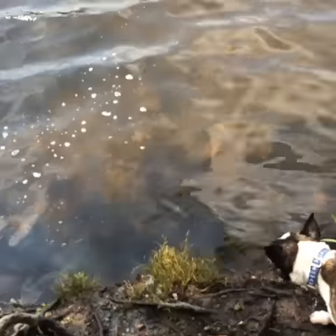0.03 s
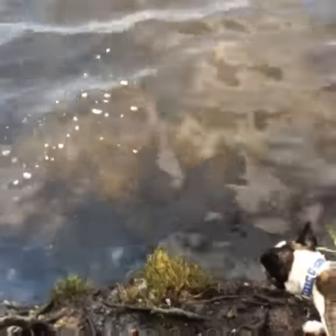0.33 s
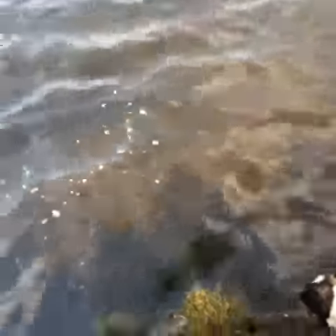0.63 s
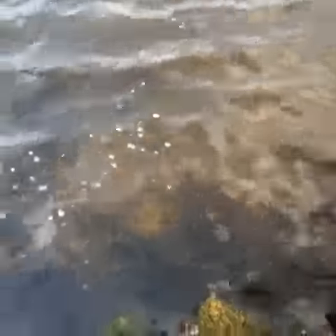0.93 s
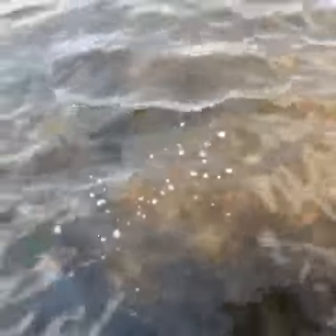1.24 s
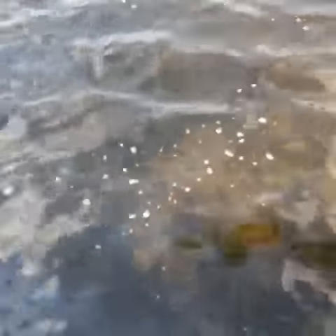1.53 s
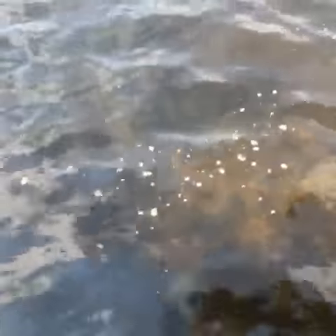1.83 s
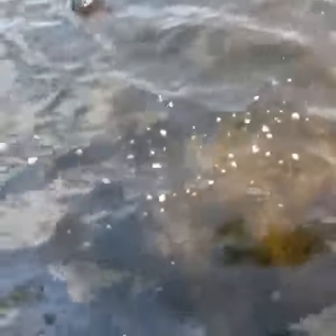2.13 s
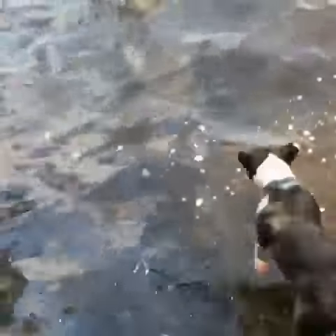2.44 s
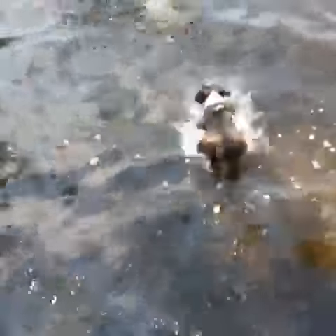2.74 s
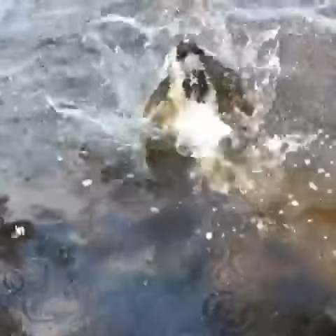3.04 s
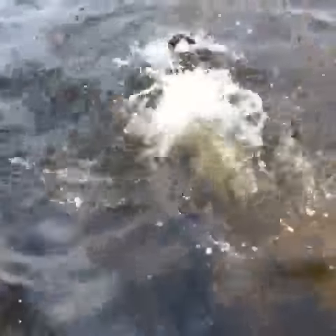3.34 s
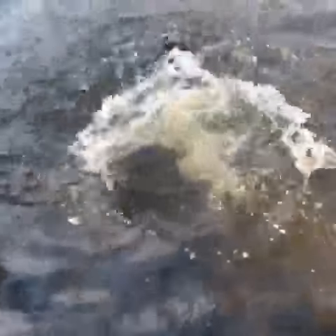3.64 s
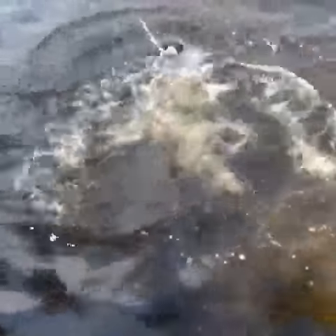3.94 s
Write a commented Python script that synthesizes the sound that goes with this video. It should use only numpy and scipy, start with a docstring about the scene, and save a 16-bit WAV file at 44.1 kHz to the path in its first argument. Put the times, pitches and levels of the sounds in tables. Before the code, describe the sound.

A loud splash as a little dog jumps into water, spray pattering down afterward.

```python
"""A small dog leaps into a lake, heard close by from one microphone on the gritty bank.
Its paws scuff and push off, its forepaws cut the surface and its chest slaps down. The air cavity
behind it rings and gulps shut, churned bubbles ring, and the thrown water patters back.
The shore scatters a short echo. Small waves trickle at the edge; wind rumble and a distant wash
lie behind."""
import sys
import numpy as np
from scipy import signal
from scipy.io import wavfile
from scipy.ndimage import uniform_filter1d

SR = 44100
rng = np.random.default_rng(int(sys.argv[2]) if len(sys.argv) > 2 else 0)


def wrap_up_sound(samples):
    """Save the sound to the file named by the first command line argument, as 16-bit audio."""
    columns = np.atleast_2d(samples).T
    # keep every value between -1 and 1, then stretch to whole-number steps
    tamed = np.clip(columns, -1, 1)
    steps = np.round(tamed * 32767).astype(np.int16)
    wavfile.write(sys.argv[1], SR, steps)


N = 176400
TIME = np.arange(N) / SR

# spectrum of plinking water, in spray and ripples: (frequency [Hz], relative density [dB])
PLINK_SPECTRUM = [(1100, 0.5), (3300, -3), (6500, -10.5)]


def slaps():
    """Forepaws and chest hit the surface, each with a sharp crack."""
    # hits on the water: (time [s], level before the band-pass [dB])
    hits = [(2.785, -20), (2.7892, -20), (2.8207, -18.5), (2.8318, -12), (2.836, -4.5), (2.849, -7)]
    return cracks(hits, fade_s=.0006, band_hz=(1150, 9600))


def cavity():
    """The air cavity behind the body rings: its tone climbs as it narrows, sinks as it is pulled under."""
    # course of the hollow tone: (time [s], pitch [Hz], level [dB])
    course = [(2.846, 370, -26.5), (2.885, 393.6, -32.5), (2.91, 457, -38), (2.943, 471, -25),
              (2.96, 468, -45), (2.978, 415, -26.5), (2.999, 305, -35.5)]
    s, hz, db = np.transpose(course)
    loudness = uniform_filter1d(amp(np.interp(TIME, s, db, left=-200, right=-200)), size=200)
    flutter = amp(1.8 * drift(per_s=120))
    phase = 2 * np.pi * np.cumsum(np.interp(TIME, s, hz)) / SR
    return loudness * flutter * np.sin(phase)


def gulps():
    """Air pockets collapse, each with a low, slightly rising note."""
    # collapses: (time [s], level [dB], starting pitch [Hz], time to fall 60 dB [s])
    pockets = [(2.943, -17.5, 180, 0.07), (2.991, -19.5, 212, 0.094), (3.039, -22, 181.4, 0.12),
               (3.05, -24, 624, .09), (3.086, -26.5, 198, 0.095), (3.109, -16, 332, 0.035),
               (3.341, -15.5, 347, 0.023)]
    return pings(pockets, attack_s=0.0016, rise_per_s=1.4)


def bubbles():
    """Churned water fills with a cloud of briefly ringing bubbles."""
    # strength of the churning: (time [s], level [dB])
    churn = [(2.74, -58), (2.785, -36), (2.815, -55), (2.838, -30.5), (2.851, -22.5), (2.91, -30.5),
             (2.938, -27), (2.985, -40.5), (3.03, -35), (3.09, -26.5), (3.12, -29), (3.15, -40),
             (3.3, -40.5), (3.5, -38), (3.64, -41), (3.8, -45), (4.0, -44.5)]
    # spectrum of the cloud: (frequency [Hz], relative density [dB])
    spectrum = [(220, -4), (380, 1), (600, 3.5), (1000, 2.5), (1500, 0), (2300, -4), (4000, -20)]
    return grains(spectrum, level(churn), per_s=4000, cycles=21, spread_db=1.5, count=48)


def spray():
    """Water is thrown up and falls back as pattering drops, ringing plinks and a hiss of mist."""
    # swell of the spray, common to all three: (time [s], relative level [dB])
    swell = [(2.7, -49.5), (2.772, -41), (2.79, -27.5), (2.806, -34.5), (2.829, -29), (2.842, -22),
             (2.876, -29.5), (2.945, -33), (3.0, -37.5), (3.05, -32.5), (3.1, -31.5), (3.21, -33.5),
             (3.29, -29), (3.37, -31), (3.41, -35.5), (3.6, -31), (3.76, -42.5), (4.0, -43.5)]
    # spectrum of drops and mist: (frequency [Hz], relative density [dB])
    spectrum = [(600, -23), (1500, -9), (2900, -1.5), (4400, -10.5), (8000, -6), (11000, -12),
                (14500, -14.5), (16000, -7)]
    shower = level(swell)
    drops = amp(-6) * grains(spectrum, shower, per_s=10000, cycles=4.8, spread_db=3)
    plinks = amp(-10.5) * grains(PLINK_SPECTRUM, shower, per_s=1400, cycles=58, spread_db=4, count=64)
    mist = amp(-7) * shower * noise(spectrum, patchy_db=2.5, per_s=29, count=12)
    return drops + plinks + mist


def paws():
    """Each scuff on the bank sets off a dying rush of wet grit."""
    # paw scuffs: (time [s], level [dB], decay time constant [s])
    scuffs = [(2.062, -44, 0.023), (2.146, -32.5, 0.028), (2.204, -41.5, 0.068), (2.246, -35, 0.027),
              (2.315, -44, 0.2), (2.422, -43.5, 0.11), (2.48, -37.5, 0.013), (2.528, -64, 0.22),
              (2.725, -52.5, 0.06)]
    # spectrum of the grit: (frequency [Hz], relative density [dB])
    spectrum = [(300, 11.5), (700, -7.5), (1500, -3), (3000, -4.5), (6000, -5.5), (9000, -6.5),
                (14000, -7.5), (16000, -3.5)]
    attack_s = 0.0013
    effort = sum(amp(db) * (1 - np.exp(-since(s) / attack_s)) * np.exp(-since(s) / fade_s)
                 for s, db, fade_s in scuffs)
    return grains(spectrum, effort, per_s=12000, cycles=11.5, spread_db=0, count=48)


def thuds():
    """The push-off and heavy water land as dull, low knocks."""
    # knocks: (time [s], level [dB], pitch [Hz])
    knocks = [(.498, -31, 284), (.625, -23, 430), (2.135, -22, 170), (2.214, -19.5, 292), (2.585, -27, 106),
              (3.343, -20, 83), (3.392, -24, 96.5)]
    return pings(ringing(knocks, cycles=7.3), attack_s=0.0019, rise_per_s=0)


def ticks():
    """Twigs and stones tick, single drops land, and the chest slap rings low: a tiny crack around each pitch,
    then a short ring."""
    # small impacts, and the low ring of the chest slap at 2.849 s: (time [s], level of the ring [dB], pitch
    # [Hz])
    impacts = [(.506, -41, 4300), (0.527, -39, 2800), (.563, -40, 6500), (.685, -44, 2800),
               (.838, -40, 5960), (1.032, -40, 3880), (1.461, -33.5, 1750), (1.462, -41, 4400),
               (2.148, -18.5, 6870), (2.209, -29, 5960), (2.259, -26.5, 6200), (2.387, -22.5, 3100),
               (2.388, -25.5, 9300), (2.426, -27.5, 870), (2.428, -29, 3360), (2.461, -31, 4500),
               (2.637, -26, 1790), (2.728, -27, 11800), (2.849, -13, 950), (3.176, -30.5, 1030),
               (3.287, -15.5, 3310), (3.5, -20, 8950), (3.883, -22, 11400)]
    snaps = sum(cracks([(s, db - 6.5)], fade_s=.0017, band_hz=(hz / 1.8, hz * 1.8))
                for s, db, hz in impacts)
    return snaps + pings(ringing(impacts, cycles=24.7), attack_s=0.00011, rise_per_s=0)


def shore_echo(near):
    """The shore scatters nearby sound back to the microphone as a short, thin tail."""
    t60_s, delay_s = 0.25, 0.00637
    tail = band(rng.standard_normal(N), 110, 18500) * amp(-60 * TIME / t60_s) * (TIME > delay_s)
    return amp(-15) * signal.fftconvolve(near, tail / np.linalg.norm(tail))[:N]


def ripples():
    """Small waves fizz and trickle at the water's edge."""
    # rise and fall of the waves: (time [s], level [dB])
    lapping = [(.1, -73), (.53, -58), (.75, -69), (.92, -56.5), (1.1, -69), (1.45, -60.5)]
    return level(lapping) * grains(PLINK_SPECTRUM, np.ones(N), per_s=4100, cycles=6.5, spread_db=3)


def wind():
    """Wind rumbles over the shore, easing and returning, with a faint low hum in it."""
    # wind strength: (time [s], relative level [dB])
    strength = [(.1, -37), (1.5, -37), (1.85, -42.5), (2.5, -45.5), (3.2, -41), (3.68, -36.5), (3.77, -37),
                (3.87, -37.5)]
    # spectrum of the rumble: (frequency [Hz], relative density [dB])
    spectrum = [(20, -31), (35, -14.5), (58, 1.5), (100, 0), (150, 1), (200, -3), (260, -18), (500, -28)]
    gusts = amp(np.interp(TIME, *np.transpose(strength)) - 1.5)
    hum_hz = 109
    drone = resonate(rng.standard_normal(N), hum_hz, width_hz=6)
    hum = amp(-6) * unit(band(drone, hum_hz / 2, hum_hz * 2))
    rumble = noise(spectrum, patchy_db=1, per_s=30, count=12)
    return gusts * (hum + rumble)


def distant_wash():
    """An even, faintly flickering rush from far off."""
    # spectrum of the wash: (frequency [Hz], relative density [dB])
    spectrum = [(200, -15), (350, 2.5), (600, -1), (780, 0.5), (950, 5), (1250, -2.5), (1800, -10),
                (2800, -22), (5000, -24), (10000, -28.5), (15500, -34.5)]
    return amp(-44) * noise(spectrum, patchy_db=1.6, per_s=17, count=36)


def sizzle():
    """A thin, high sizzle grows through the first second and drops away."""
    # swell of the sizzle: (time [s], level [dB])
    swell = [(.1, -75), (.95, -66.5), (1.1, -100)]
    return level(swell) * unit(resonate(rng.standard_normal(N), hz=11300, width_hz=350))


def amp(db):
    """Decibels to gain."""
    return 10 ** (np.asarray(db) / 20)


def unit(x):
    """Scale to rms 1."""
    return x / np.sqrt(np.mean(x ** 2) + 1e-20)


def level(rows):
    """Gain over time from (time [s], level [dB]) rows; silent before the first, held after the last."""
    return amp(np.interp(TIME, *np.transpose(rows), left=-200))


def since(s):
    """Time since an event, zero before it."""
    return np.maximum(TIME - s, 0)


def drift(per_s):
    """Slow random wander, rms 1."""
    knots = rng.standard_normal(2048)
    return unit(np.interp(TIME * per_s, np.arange(len(knots)), knots))


def band(x, low_hz, high_hz):
    """Butterworth band-pass."""
    sos = signal.butter(2, [low_hz, min(high_hz, .47 * SR)], "band", fs=SR, output="sos")
    return signal.sosfilt(sos, x)


def band_gains(spectrum, hz):
    """Gains of log-spaced bands under a spectrum; total power 1."""
    knots_hz, db = np.transpose(spectrum)
    gains = amp(np.interp(np.log(hz), np.log(knots_hz), db)) * np.sqrt(hz)
    return gains / np.linalg.norm(gains)


def resonate(x, hz, width_hz):
    """One resonance that keeps the power of white input."""
    radius = np.exp(-np.pi * width_hz / SR)
    forward = np.sqrt((1 - radius ** 2) / 2) * np.array([1, 0, -1])
    feedback = [1, -2 * radius * np.cos(2 * np.pi * hz / SR), radius ** 2]
    underflow_guard = 1e-18 * (-1) ** (np.arange(len(x)) // 2)
    return signal.lfilter(forward, feedback, x + underflow_guard)


def noise(spectrum, patchy_db, per_s, count):
    """Bands of noise, each flickering on its own; rms 1."""
    edges = np.geomspace(spectrum[0][0], spectrum[-1][0], count + 1)
    gains = band_gains(spectrum, np.sqrt(edges[1:] * edges[:-1]))
    white = rng.standard_normal((2, N))
    bands = (gain * unit(band(white[k % 2], edges[k], edges[k + 1])) for k, gain in enumerate(gains))
    return unit(sum(hiss * amp(patchy_db * drift(per_s)) for hiss in bands))


def grains(spectrum, envelope, per_s, cycles, spread_db, count=32):
    """Random tiny impacts, each ringing at one of `count` pitches; denser where the envelope is high."""
    density = np.sqrt(envelope / envelope.max()) + .01
    chance = np.minimum(per_s * density / SR, 1)
    sizes = unit(amp(spread_db * np.minimum(rng.exponential(1, N), 4.5))) * rng.choice([-1, 1], N)
    clicks = sizes * (rng.random(N) < chance) * envelope * np.sqrt(count / chance)
    pitches = np.geomspace(spectrum[0][0], min(spectrum[-1][0], SR / 2), count)
    pitch_index = rng.integers(0, count, N)
    return sum(gain * resonate(clicks * (pitch_index == k), hz, width_hz=2.2 * hz / cycles)
               for k, (hz, gain) in enumerate(zip(pitches, band_gains(spectrum, pitches))))


def cracks(rows, fade_s, band_hz):
    """Very short, band-passed bursts of noise."""
    length = int(20 * fade_s * SR)
    decay = np.exp(-TIME[:length] / fade_s)
    bursts = np.zeros(N)
    for s, db in rows:
        start = int(s * SR)
        bursts[start:start + length] += amp(db) * decay * rng.choice([-1, 1], length)
    underflow_guard = 1e-18 * rng.standard_normal(N)
    return band(bursts + underflow_guard, *band_hz)


def ringing(rows, cycles):
    """Give each event a 60 dB decay time of so many cycles of its pitch."""
    return [(s, db, hz, cycles / hz) for s, db, hz in rows]


def pings(rows, attack_s, rise_per_s):
    """Damped sines whose pitch may climb as they die."""
    tones = np.zeros(N)
    for s, db, hz, t60 in rows:
        t = since(s)[:int((s + 2 * t60) * SR)]
        envelope = amp(db - 60 * t / t60) * (1 - np.exp(-t / attack_s))
        phase = 2 * np.pi * hz * t * (1 + rise_per_s * t / 2)
        tones[:len(t)] += envelope * np.sin(phase)
    return tones


def scene():
    """From the bank, in mono: dog and splash close by with their echo, the open air behind."""
    near = paws() + ticks() + spray() + bubbles() + slaps() + gulps() + cavity() + thuds()
    return (near + shore_echo(near) + ripples() + wind() + distant_wash() + sizzle())[None]


def record(dry):
    """The microphone opens after a moment of silence; the highest treble is cut steeply."""
    start_s, fade_s, cutoff_hz = .084, .002, 15550
    opened = dry * np.clip((TIME - start_s) / fade_s, 0, 1)
    return signal.sosfilt(signal.ellip(12, .2, 80, cutoff_hz, fs=SR, output="sos"), opened)


dry = scene()
out = record(dry)
wrap_up_sound(out)
```